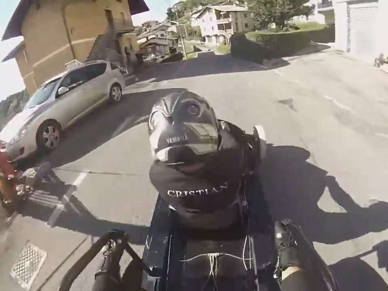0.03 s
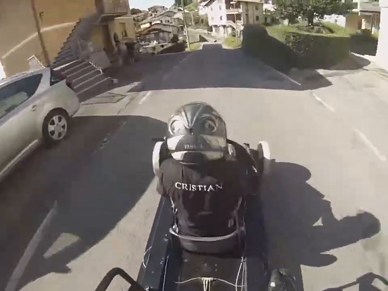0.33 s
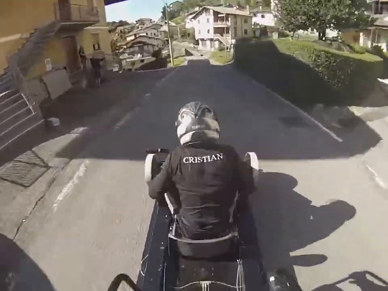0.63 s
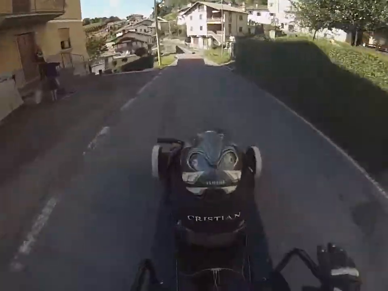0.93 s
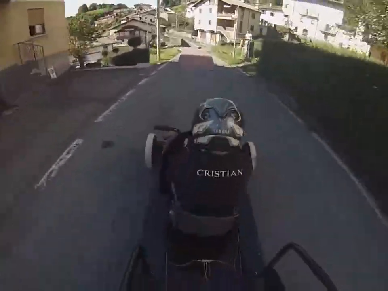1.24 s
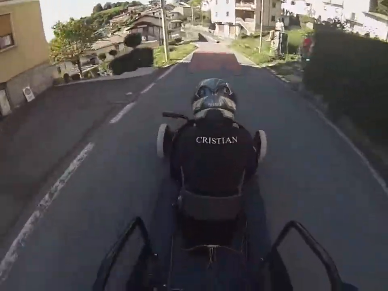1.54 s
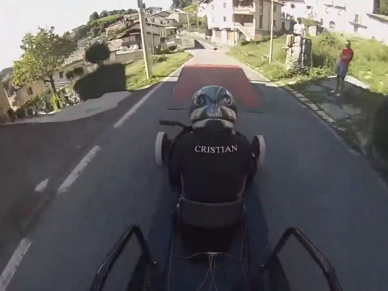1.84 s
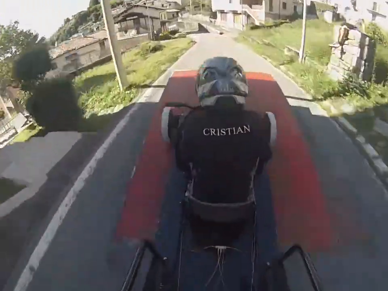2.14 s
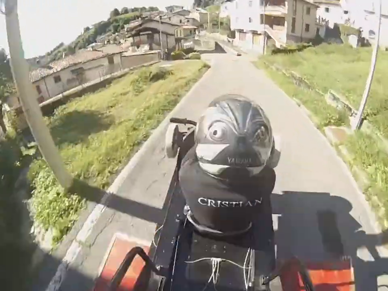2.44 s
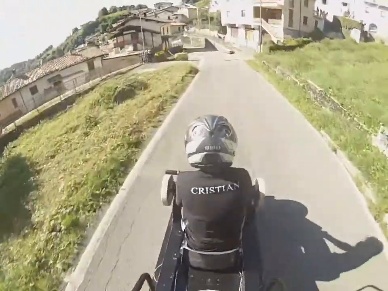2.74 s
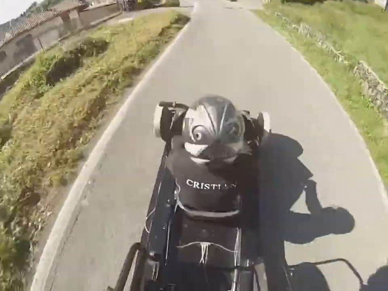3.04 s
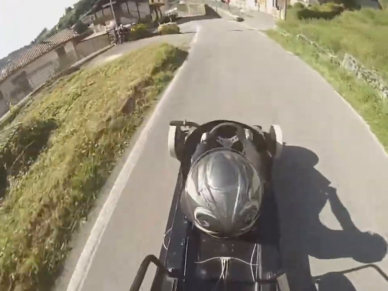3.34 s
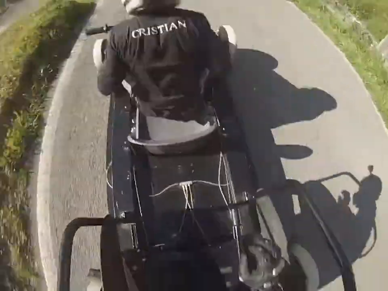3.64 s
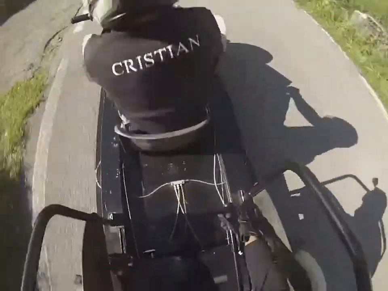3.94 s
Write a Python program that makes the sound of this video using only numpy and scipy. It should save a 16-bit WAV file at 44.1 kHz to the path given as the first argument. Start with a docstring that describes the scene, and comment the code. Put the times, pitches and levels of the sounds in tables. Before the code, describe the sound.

A gravity cart rumbles and rattles over rough asphalt, heard close from its own frame. Scattered bumps bang through it, with heavier jolts, thuds and shuddering past the middle. A loose metal fitting clinks and wind rumbles underneath.

```python
"""Rough asphalt drums and rattles under a fast gravity cart, heard from a camera fixed to its frame.
Road grit pelts the wheels and rings the deck and frame; bumps and a raised crossing jolt the cart
and set it shuddering, and the wheels thud back down. A loose metal fitting clinks,
the camera mount chatters in short bursts, and wind rumbles underneath."""
import sys
import numpy as np
from scipy import signal
from scipy.fft import rfft, irfft
from scipy.io import wavfile
from scipy.ndimage import uniform_filter1d

SR = 44100
rng = np.random.default_rng(int(sys.argv[2]) if len(sys.argv) > 2 else 0)


def file_out(sig):
    """Save sig as 16-bit WAV at sys.argv[1]."""
    # one column per channel
    cols = np.atleast_2d(sig).T
    # limit, then scale
    lim = np.clip(cols, -1, 1)
    pcm = np.round(lim * 32767).astype(np.int16)
    wavfile.write(sys.argv[1], SR, pcm)


N = 176400
T = np.arange(N) / SR

# Broad tone of the wheels and deck. Each row: frequency in Hz, relative gain in dB.
DECK_TONE = [(50, -13), (130, -5), (290, -6.5), (600, -13.5), (1000, -25.5), (3000, -71)]
# Their resonances, with one hollow. Each row: centre in Hz, width in Hz, boost or cut in dB.
DECK_RESONANCES = [(130.9, 25.3, 10.5), (175, 26, -17), (212.2, 41, 11), (362, 60, 8.5)]


def amp(db):
    """Decibels to gain."""
    return 10 ** (np.asarray(db) / 20)


def unit(x):
    """Scales to rms 1."""
    return x / np.sqrt(np.mean(x ** 2) + 1e-20)


def curve(table, column):
    """One column of a table, joined by straight lines in time."""
    rows = np.array(table)
    return np.interp(T, rows[:, 0], rows[:, column])


def add(mix, start_s, sound):
    """Mixes a sound in at a time."""
    part = mix[max(round(start_s * SR), 0):][:len(sound)]
    part += sound[:len(part)]


def wander(hz):
    """Random drift of rms 1, rolling off above the given rate."""
    f = np.fft.rfftfreq(N, 1 / SR)
    noise = rfft(rng.standard_normal(N))
    return unit(irfft(noise * f / (f + hz / 10) / (1 + (f / hz) ** 4), N))


def ring(x, tone, modes=(), size=8192):
    """Passes x through a body of energy gain 1: a broad tone with resonances that ring on."""
    f = np.fft.rfftfreq(size, 1 / SR)
    hz, db = np.transpose(tone)
    broad = amp(np.interp(np.log(f + 1), np.log(hz), db))
    peaks = 1 + sum((amp(boost) ** 2 - 1) / (1 + (2 * (f - centre) / width) ** 2)
                    for centre, width, boost in modes)
    log_gain = np.log(broad) + .5 * np.log(np.maximum(peaks, 1e-3))
    mirrored = np.concatenate([log_gain, log_gain[-2:0:-1]])
    minimum_phase = np.exp(np.conj(signal.hilbert(mirrored)))
    response = np.fft.ifft(minimum_phase).real[:size // 2]
    return signal.oaconvolve(x, response / np.linalg.norm(response))[:N]


def impacts(per_s, spread_db):
    """A random train of tiny blows of uneven size, rms 1."""
    size = amp(spread_db * np.minimum(rng.exponential(1, N), 3))
    return unit(size * rng.choice([-1, 1], N) * (rng.random(N) < per_s / SR))


def frame(x):
    """Rings the frame, drifting between a sharp and a flat tuning as the joints tighten and slacken."""
    # Broad tone of the frame. Each row: frequency in Hz, relative gain in dB.
    tone = [(150, -23), (480, -0.5), (640, -4), (800, 0), (1300, -1), (1820, -5.5), (2300, -3), (2550, -6),
            (2950, -15.5), (3600, -13.5), (4400, -25.5), (8000, -55)]
    # Its resonances at rest. Each row: centre in Hz, width in Hz, boost in dB.
    modes = [(1389, 39, 13.5), (1562, 55, 7), (1644, 53, 10.5), (2040, 65, 13.5), (2143, 29, 10.5),
             (2347, 33, 6.5)]
    detune = .013
    blend = np.pi / 4 * (1 + np.tanh(2 * wander(hz=4)))
    sharp = [(hz * (1 + detune), width, db) for hz, width, db in modes]
    flat = [(hz * (1 - detune), width, db) for hz, width, db in modes]
    return ring(x * np.sin(blend), tone, sharp) + ring(x * np.cos(blend), tone, flat)


def rolling():
    """Grit rattles the frame, drums the deck and hisses under the tyres; bumps swell rattle and hiss."""
    # Road noise. Each row: time in seconds, then rattle, drum and hiss levels in relative dB.
    levels = [(0, -30, -19.5, -49.5), (.54, -28, -21.5, -55.5), (.6, -23, -22, -45.5),
              (.95, -22, -17, -43.5), (1.33, -24, -18.5, -46.5), (1.43, -22.5, -18, -42),
              (2.1, -25.5, -20.5, -45.5), (2.28, -33.5, -24.5, -56), (2.48, -25, -23.5, -54),
              (2.74, -31.5, -26, -62), (2.87, -32.5, -57, -66), (2.94, -23, -19.5, -44),
              (3.12, -39, -34.5, -62), (3.25, -32, -34.5, -58.5), (3.4, -28.5, -23, -56.5),
              (3.65, -31, -22.5, -50), (3.85, -21.5, -18, -41)]
    # Tone of the tyre hiss. Each row: frequency in Hz, relative gain in dB.
    hiss_tone = [(1500, -23), (3500, -4), (4400, -3.5), (5300, 5), (6100, -3), (7250, 3), (9000, -17),
                 (10500, -10), (12500, -27), (15000, -33)]
    grit = dict(per_s=2200, spread_db=.5)
    bumps = wander(hz=29.7)
    rattle_gain = amp(curve(levels, 1) - 2.5 + 1.52 * bumps)
    drum_gain = amp(curve(levels, 2) - 6.5)
    hiss_gain = amp(curve(levels, 3) + 3 * bumps)
    rattle = frame(impacts(**grit) * rattle_gain)
    drum = ring(impacts(**grit) * drum_gain, DECK_TONE, DECK_RESONANCES)
    hiss = ring(impacts(per_s=4600, spread_db=4.5) * hiss_gain, hiss_tone)
    return rattle + drum + hiss


def chatter():
    """The mount rubs briefly at each swing of the deck that closes its gap."""
    # Bursts of chatter. Each row: time in seconds, level in dB.
    levels = [(0, -60.5), (2.2, -56.5), (2.4, -98), (2.85, -90), (3, -52), (3.2, -87), (3.55, -56.5),
              (3.8, -49)]
    # Thin, bright tone of the mount. Each row: frequency in Hz, relative gain in dB.
    tone = [(2000, -44), (7300, 3), (9000, -4), (10200, -1.5), (11200, 2.5), (12300, -11), (15000, -28)]
    swing_hz, width_hz, rub_s = 208, 35, .0016
    gap = 1.1  # in units of the rms swing
    pole = np.exp((-np.pi * width_hz + 2j * np.pi * swing_hz) / SR)
    swing = unit(signal.lfilter([1], [1, -pole], rng.standard_normal(N)).imag)
    pressure = np.tanh(np.maximum(swing - gap, 0))
    contact = unit(uniform_filter1d(pressure, round(rub_s * SR)))
    return ring(contact * rng.standard_normal(N) * amp(curve(levels, 1)), tone)


def shudder():
    """The whole frame flexes unevenly at its lowest mode, harder and slower after heavy jolts."""
    # Flexing of the frame. Each row: time in seconds, level in relative dB, centre pitch in Hz.
    flexing = [(0, -43, 41.9), (1.15, -26, 40.13), (2.12, -32, 38.3), (2.165, -16, 30.7),
               (2.24, -6.5, 31.7), (2.28, -23, 22.1), (2.35, -8.5, 27), (2.43, -23.5, 36),
               (2.91, -29.5, 36.33), (2.96, -9.5, 34.5), (3.08, -10, 40.5), (3.13, -19, 40.9),
               (3.67, -27.5, 41.5), (3.92, -12, 38.5)]
    hz = curve(flexing, 2) * (1 + .07 * wander(hz=35))
    waver_db = 2.2 * np.minimum(wander(hz=30), 1)
    level = amp(curve(flexing, 1) - 1 + waver_db)
    return level * np.sin(2 * np.pi * np.cumsum(hz) / SR)


def wind():
    """Gusts of air buffet the housing with a lumpy low rumble."""
    # Tone of the rumble. Each row: frequency in Hz, relative gain in dB.
    tone = [(20, 12), (45, 15.5), (65, -25), (400, -10), (2000, -64)]
    gusts = amp(2 * wander(hz=6))
    return amp(-33) * ring(rng.standard_normal(N) * gusts, tone)


def jolts():
    """Each jolt is a bouncing volley of collisions: a clang in the frame, a deck thump, a bright crash."""
    # Bumps in the road. Each row: start in seconds, strength in relative dB,
    # seconds until the volley starts to fade, brightness in relative dB.
    hits = [(0.074, -19.5, 0.0051, -7), (0.579, -10.5, 0.011, -1), (0.863, -17.5, 0.03, 2.5),
            (0.977, -12.5, 0.0084, 2), (1.159, -16, 0.016, 3), (1.24, -15, 0.0088, -3),
            (1.603, -20, 0.013, 8), (2.116, -6.5, 0.0067, 7.5), (2.131, -17.5, 0.044, -3),
            (2.18, -16, 0.022, 4), (2.214, -18, 0.028, 2), (2.297, -13, 0.026, 3.5), (2.435, -21, 0.012, 4),
            (2.882, -9, 0.0067, 5), (2.890, -10.5, 0.0085, 3), (2.912, -9.5, 0.015, 1.5),
            (2.956, -16.5, 0.006, -1), (2.994, -8, 0.0094, 0.5), (3.015, -18.5, 0.0036, 6.5),
            (3.049, -23, 0.0085, -5), (3.162, -21.5, 0.0074, -7), (3.345, -21.5, .008, -8),
            (3.425, -18, .008, -1), (3.871, -18.5, 0.0035, 9.5)]
    # Tone of the crash. Each row: frequency in Hz, relative gain in dB.
    crash_tone = [(1200, -56), (2600, 2), (3700, -4), (4500, -4), (6200, -8), (7400, -6), (9000, -25),
                  (11200, -19.5), (15500, -58)]
    rise_s, fall_s = .002, .011
    collisions = dict(per_s=3000, spread_db=1.5)
    force, bright_force = np.zeros((2, N))
    t = T[:SR // 4]
    bounce = amp(1.8 * np.minimum(wander(hz=130), 1))
    for start_s, db, hold_s, bright_db in hits:
        envelope = amp(db) * np.minimum(t / rise_s, 1) * np.exp(-np.maximum(t - hold_s, 0) / fall_s)
        add(force, start_s, envelope)
        add(bright_force, start_s, envelope * amp(bright_db))
    clang = frame(bounce * force * impacts(**collisions))
    thump = ring(force * impacts(**collisions), DECK_TONE, DECK_RESONANCES)
    crash = ring(bounce * bright_force * impacts(per_s=6000, spread_db=3), crash_tone)
    return amp(-4.5) * clang + amp(-7.5) * thump + amp(-23) * crash


def clinks():
    """A small loose fitting is knocked: a dry metallic clack that also ticks through the frame."""
    # Knocks on the fitting. Each row: start in seconds, level in relative dB.
    knocks = [(0.257, -37.5), (0.345, -31.5), (1.6062, -27.5), (2.1653, -22), (2.249, -27), (2.4367, -19.5),
              (2.4782, -34), (2.5114, -32.5), (2.529, -34), (2.601, -34), (2.829, -35), (3.143, -36),
              (3.2931, -25.5), (3.43, -40), (3.8739, -20.5)]
    # Broad tone of the fitting. Each row: frequency in Hz, relative gain in dB.
    tone = [(1500, -32), (3600, 8), (5650, 6.5), (6200, -9.5), (11000, -20.5), (15000, -40)]
    # Its metallic ring. Each row: centre in Hz, width in Hz, boost in dB.
    modes = [(4850, 330, 6), (5450, 350, 10)]
    decay_s = .0025
    ticks, t = np.zeros(N), T[:SR // 10]
    for start_s, db in knocks:
        add(ticks, start_s, amp(db) * np.exp(-t / decay_s) * rng.standard_normal(len(t)))
    return amp(1) * ring(ticks, tone, modes) + amp(6.5) * frame(ticks)


def thuds():
    """The wheels come down after the crossing and set the deck ringing roughly for a moment."""
    # Wheel landings. Each row: start in seconds, peak level in dB, pitch of the deck's ring in Hz.
    landings = [(2.312, -19, 180), (2.468, -19, 208), (2.505, -21, 128), (2.535, -23, 84)]
    rise_s, roughness_rad = .014, .9
    mix, t = np.zeros(N), T[:SR // 4]
    for start_s, db, hz in landings:
        phase = 2 * np.pi * hz * t + roughness_rad * wander(hz=150)[:len(t)]
        envelope = amp(db) * t / rise_s * np.exp(1 - t / rise_s)
        add(mix, start_s, envelope * np.sin(phase))
    return mix


def scene():
    """Every layer arrives close and dry, in mono."""
    return (rolling() + jolts() + thuds() + clinks() + chatter() + shudder() + wind())[None]


def record(dry):
    """Soft saturation rounds the hardest jolts, then a steep low-pass trims the top."""
    ceiling, cutoff_hz = 1.15, 15500
    saturated = ceiling * np.tanh(dry / ceiling)
    lowpass = signal.firwin(511, cutoff_hz, window=("kaiser", 9), fs=SR)
    return signal.oaconvolve(saturated, lowpass[None], "same")


dry = scene()
out = record(dry)
file_out(out)
```